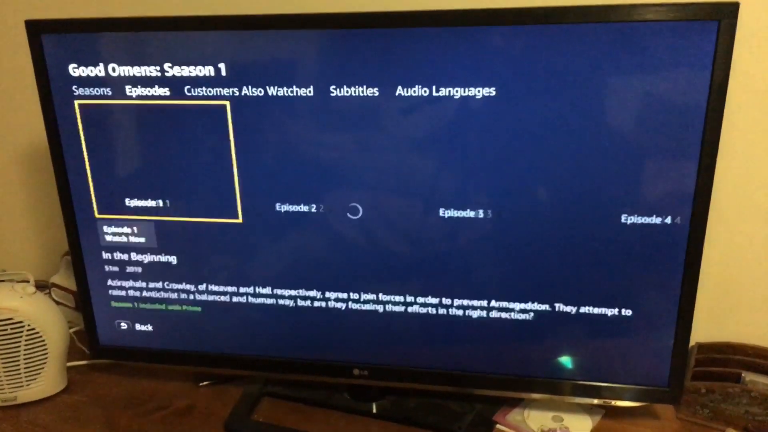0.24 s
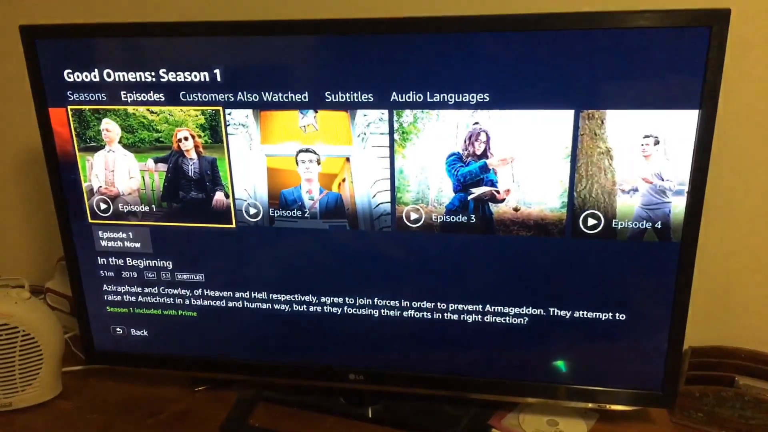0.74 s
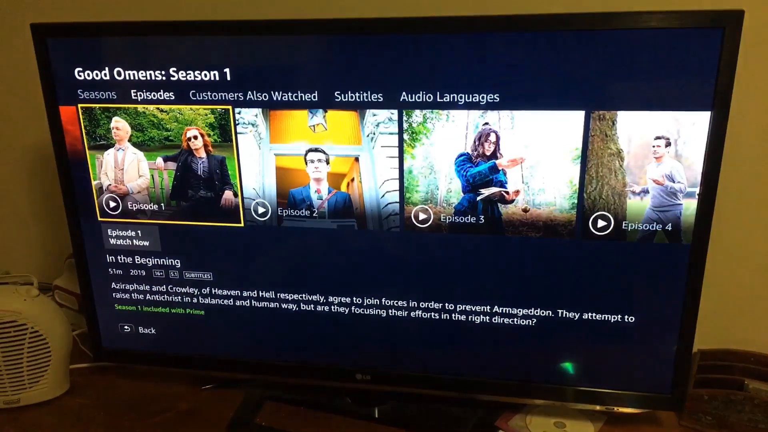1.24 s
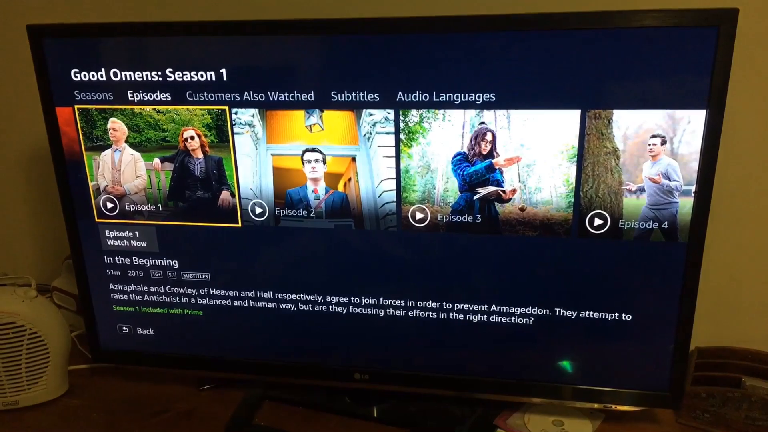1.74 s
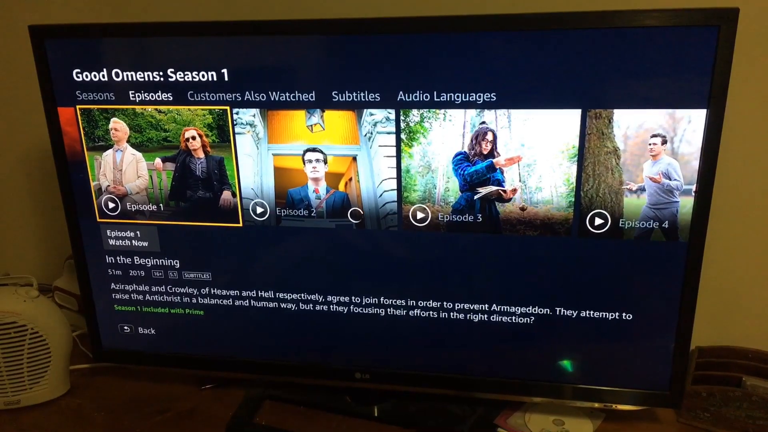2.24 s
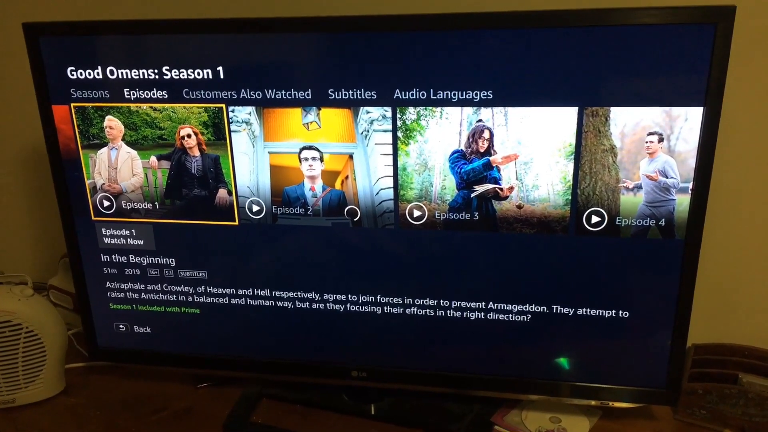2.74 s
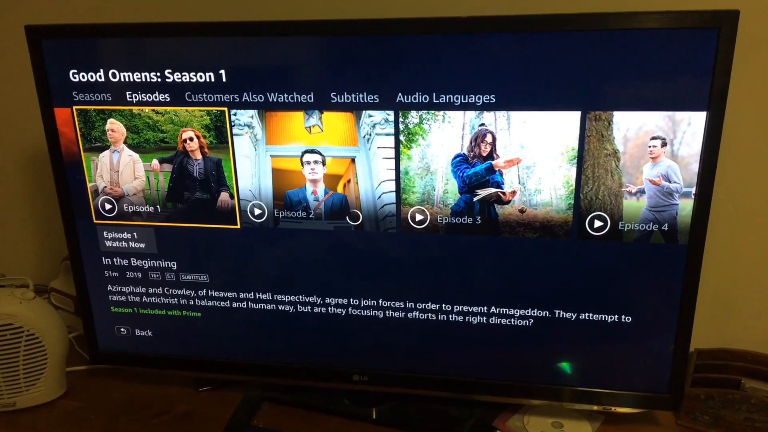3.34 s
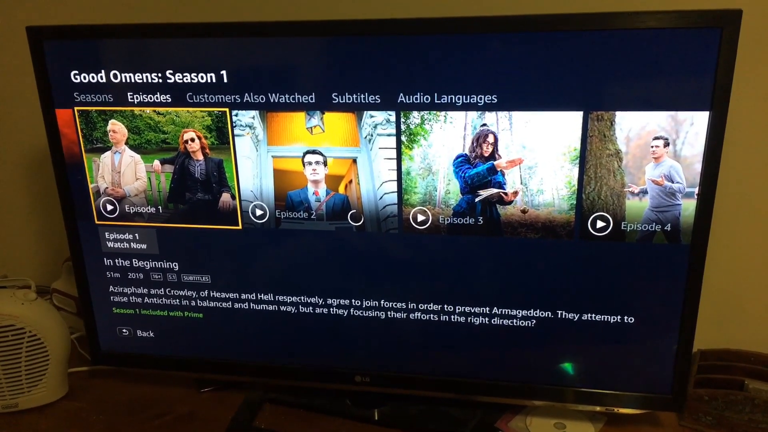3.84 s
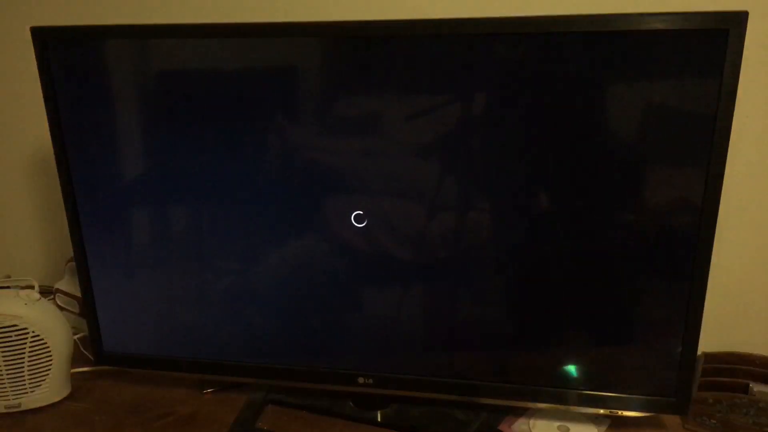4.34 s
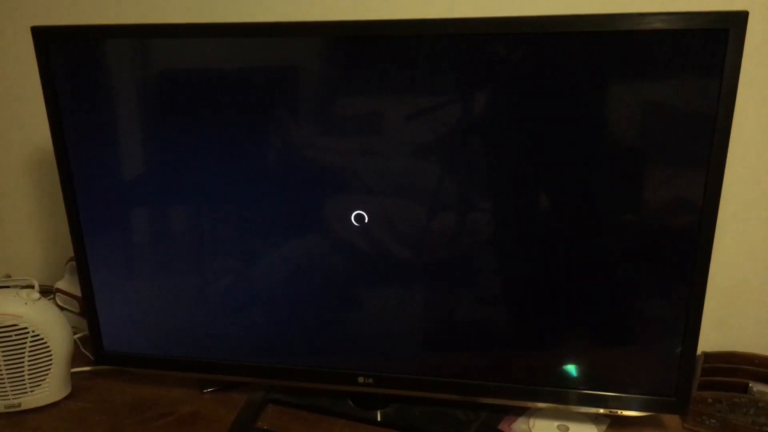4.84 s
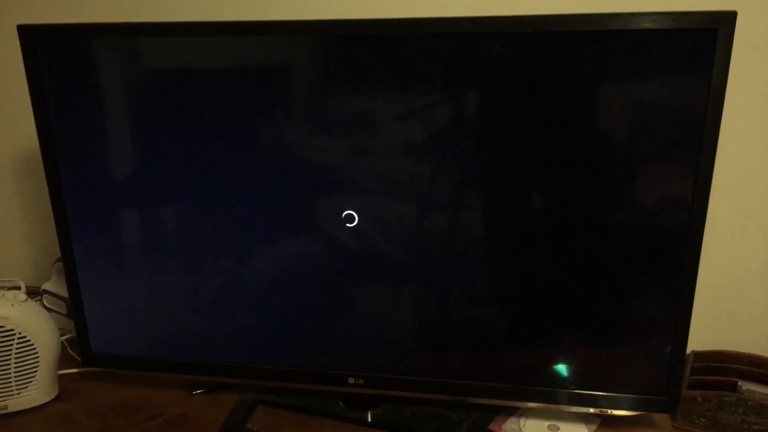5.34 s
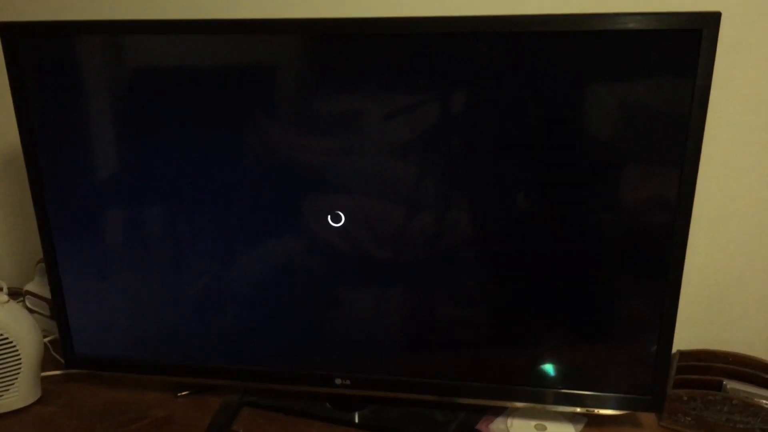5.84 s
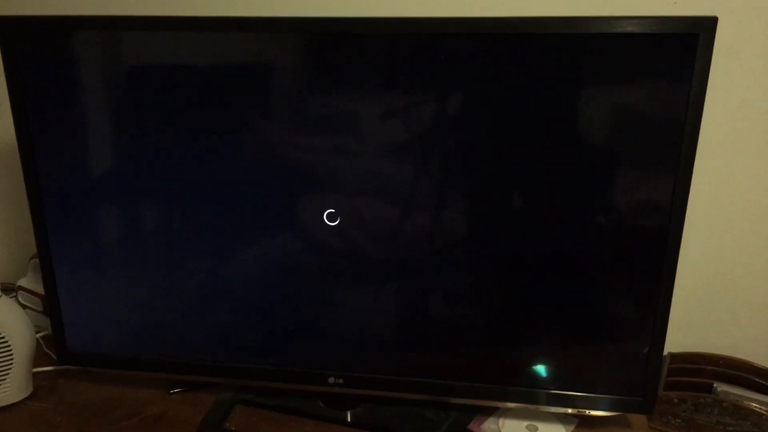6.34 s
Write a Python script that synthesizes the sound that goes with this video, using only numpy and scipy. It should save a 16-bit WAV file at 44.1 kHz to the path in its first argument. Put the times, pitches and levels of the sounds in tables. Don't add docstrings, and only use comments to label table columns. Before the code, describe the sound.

Plastic remote control buttons click in irregular bursts in a small quiet room, with a few dry finger taps, over a low steady fan hum and soft hiss.

```python
import sys
import numpy as np
from scipy import signal
from scipy.fft import rfft, irfft, next_fast_len
from scipy.io import wavfile
from scipy.ndimage import uniform_filter1d

SR = 44100
rng = np.random.default_rng(int(sys.argv[2]) if len(sys.argv) > 2 else 0)


def to_wav(s):
    ch = np.atleast_2d(s).T
    pcm = np.round(np.clip(ch, -1, 1) * 32767)
    wavfile.write(sys.argv[1], SR, pcm.astype(np.int16))


def invert_db(x):
    u = np.asarray(x, float) / 20
    return 10 ** u


N = 291060
STEADY_TOP_HZ = 15780


def unit(x):
    return x / np.sqrt(np.mean(x ** 2) + 1e-20)


def along(points, hz):
    point_hz, value = np.transpose(points)
    return np.interp(np.log(hz + 1), np.log(point_hz + 1), value)


def curves(rows):
    time_s, *columns = np.transpose(rows)
    return [np.interp(np.arange(N) / SR, time_s, column) for column in columns]


def noise(spectrum):
    size = next_fast_len(N)
    hz = np.fft.rfftfreq(size, 1 / SR)
    colour = invert_db(along(spectrum, hz)) * (hz < STEADY_TOP_HZ)
    return unit(irfft(rfft(rng.standard_normal(size)) * colour, size)[:N])


def placed(rows, times, early):
    out = np.zeros(N + SR)
    for row, s in zip(rows, times):
        out[round((s - early) * SR):][:len(row)] += row
    return out[:N]


# (pitch_hz, time_to_fade_60_db_s)
ROOM_RING = [(300, 0.6), (1000, 0.4), (2800, 0.42), (7000, 0.35), (15000, 0.18)]


def tails(count, onset):
    size = SR // 2
    hz, t, z = signal.stft(rng.standard_normal((count, size)), SR, nperseg=256)
    fade_s = along(ROOM_RING, hz)[:, None]
    z = z * (hz < STEADY_TOP_HZ)[:, None] / np.sqrt(fade_s)
    tail = signal.istft(z * invert_db(-60 * t / fade_s), SR, nperseg=256)[1][:, :size]
    tail = tail * (1 - np.exp(-np.arange(size) / SR / onset))
    return tail / np.sqrt(np.mean(np.sum(tail ** 2, axis=1)))


# (pitch_hz, level_db_per_hz)
HISS_COLOUR = [(100, -2), (300, -6.5), (500, -15), (1100, -12), (2100, -11), (3200, -19.5), (7500, -20),
               (15700, -9.5)]
# (pitch_hz, level_db_per_hz)
MURMUR_COLOUR = [(50, -20), (75, -7), (120, -1.5), (300, -8), (420, -11.5), (700, -17)]
# (middle_s, rise_db, half_length_s)
FAR_SWELLS = [
    (.3, 3, 0.44),
    (3.103, 5.5, 0.17),
]


def air():
    t = np.arange(N) / SR
    swell_db = sum(db * np.exp(-((t - s) / half) ** 2) for s, db, half in FAR_SWELLS)
    murmur_db = -67.5 - 0.5 * t + swell_db
    return invert_db(murmur_db) * noise(MURMUR_COLOUR) + invert_db(-68.5) * noise(HISS_COLOUR)


# (pitch_hz, level_db_rms)
HUM_TONES = [
    (48.79, -42),
    (97.58, -72.5),
    (90, -76),
    (105.48, -75.7),
    (200, -78.5),
    (312, -82),
]
# (pitch_hz, level_db_per_hz)
RUMBLE = [(12, -25), (25, 0), (36, 0), (45, -2), (58, -9), (70, -12), (110, -40)]
# (pitch_hz, level_db_per_hz)
TREMOR = [(.3, -30), (1, -6), (4, -8), (7, 0), (11, -8), (16, -40)]
# (time_s, unsteadiness_0_to_1)
HAND_UNSTEADINESS = [
    (0, 0),
    (4.2, 0),
    (4.5, .6),
    (5.4, .5),
    (6.2, .5),
    (6.6, 1),
]


def fan():
    t = np.arange(N) / SR
    (hand,) = curves(HAND_UNSTEADINESS)
    hum = sum(-np.sqrt(2) * invert_db(db) * np.sin(2 * np.pi * hz * t) for hz, db in HUM_TONES)
    waver_db = (0.25 + 1.15 * hand) * noise(TREMOR)
    rumble_db = -66 + 5 * hand
    return hum * invert_db(waver_db) + invert_db(rumble_db) * noise(RUMBLE)


# (start_s, level_db, pitch_hz)
TABLE_KNOCKS = [(0.665, -37, 1580), (.672, -48, 740), (3.0067, -42, 1840), (3.005, -41.5, 1070),
                (3.214, -41, 780), (3.241, -38.5, 850), (3.347, -40, 307), (4.575, -48, 820),
                (5.094, -57, 241), (5.593, -35, 1940), (5.658, -56, 150), (5.797, -52, 507),
                (5.999, -45, 960), (6.323, -29.5, 2160), (6.408, -43.5, 1200), (6.437, -43, 1200),
                (6.461, -56, 164), (6.518, -36, 2050)]


def thumps():
    rows, t = np.array(TABLE_KNOCKS), np.arange(2600) / SR
    level_db, hz = rows[:, 1:2], rows[:, 2:]
    fade = invert_db(level_db - 60 * t * hz / 12)
    rise = 1 - np.exp(-t * hz / 0.5)
    knock = fade * np.sin(2 * np.pi * hz * t) * rise
    path = invert_db(-12) * tails(len(rows), onset=.003)
    path[:, 0] = 1
    return placed(signal.fftconvolve(knock, path, axes=1), rows[:, 0], 0)


# (start_s, peak_db, dull_db, bright_db)
FINGER_TAPS = [
    (1.4027, -25, -10.5, -12.5),
    (1.5699, -26, -9, -15.5),
    (5.796, -38.5, -9, -30),
    (5.902, -39, -13, -5.5),
    (5.986, -50, -6, -10),
    (6.312, -38.5, -18, -1),
    (6.323, -37, -8, -27),
]
# (pitch_hz, level_db, time_to_fade_60_db_s)
SHELL_NOTES = [(375, -10.5, .012), (550, -19, 0.02), (844, -6.5, 0.012), (1347, -5.5, 0.0058),
               (1910, -11.5, 0.014), (2940, -0.5, 0.0068), (3960, -19, 0.011), (4600, -21.5, 0.0093),
               (7300, 0, 0.0011), (11300, 0.5, 0.00076)]


def taps():
    rows, t = np.array(FINGER_TAPS), np.arange(900) / SR
    level, dull, bright = rows.T[1:, :, None]
    knock = 0
    for k, (hz, db, t60) in enumerate(SHELL_NOTES):
        late_s = .0016 * min(1, 800 / hz) ** 1.5
        age = np.clip(t - late_s, 0, None)
        share = np.where(hz < 2400, dull + 10, np.where(hz > 5500, bright + 15, 0))
        fade = invert_db(level + share + db - 60 * age / t60)
        rise = 1 - np.exp(-age * hz)
        knock = knock + (-1) ** k * fade * np.sin(2 * np.pi * hz * age) * rise
    path = invert_db(-14) * tails(len(rows), onset=.006)
    path[:, 0] = 1
    return placed(signal.fftconvolve(knock, path, axes=1), rows[:, 0], .0002)


# (start_s, peak_db, low_ring_db, top_ring_db)
BIG_KEY_CLICKS = [(.1375, -62, 7, -20), (0.1697, -45, -11, -31), (0.5682, -43.5, -10, -12),
                  (.603, -22.5, -16, -17), (1.4569, -36, -10, -7), (1.5943, -31, -12.5, -7),
                  (.19, -50.5, -3, -30), (1.759, -42, -8.5, -27), (2.4713, -32, -10.5, -38),
                  (2.7212, -24, -7.5, -7), (3.3198, -39.5, 0.5, -8), (3.3503, -5, -13.5, -6.5),
                  (4.0126, -41, -10, -6), (4.1015, -42, -9.5, -20), (4.148, -26.5, -10, -23),
                  (4.4765, -40, -11, -30), (4.4929, -22, -7, -9.5), (4.5734, -20.5, -5.5, -16.5),
                  (4.712, -34.5, -14, -13.5), (5.3008, -24.5, -21.5, -10.5), (5.3902, -18, -22.5, -25),
                  (5.434, -32, -4.5, -4.5), (5.4947, -22.5, -24, -6), (5.593, -51, -3, -33),
                  (6.021, -35.5, -11, -14.5), (6.4042, -34, -9, -10.5), (6.455, -28, -13, -2)]
# (start_s, peak_db, low_ring_db, top_ring_db)
SMALL_KEY_CLICKS = [(0.669, -25, -10, -16), (3.184, -31, -13.5, -7), (3.5662, -41.5, -5.5, 5),
                    (3.627, -24, -10, -13.5), (4.944, -27, -39, -40), (5.028, -37.5, -12, -6),
                    (5.3337, -22, -20, -6.5), (5.3622, -19, -18, -27), (5.671, -18, -16, -6.5),
                    (5.7987, -26.5, -14.5, -20)]
# (start_s, peak_db, low_ring_db, top_ring_db)
LOOSE_GRIP_CLICKS = [(0.6753, -19.5, -11.5, -20), (1.038, -47.5, -4.5, -15), (1.9967, -43, 1.5, -37),
                     (3.157, -31, -19.5, -12), (3.2133, -20.5, -15, -11.5), (5.4419, -38.5, 1.5, -7),
                     (6.185, -10, -16, -8)]
# (start_s, peak_db, low_ring_db, top_ring_db)
TIGHT_GRIP_CLICKS = [(0.2628, -37, -18, -34), (.3528, -18, -22.5, -22), (1.332, -45, -7, -24),
                     (2.693, -23, -18.5, -15.5), (4.391, -47.5, -1, -34), (4.5373, -16, -20, -13)]
# (start_s, peak_db, low_ring_db, top_ring_db)
SEAM_CREAKS = [
    (1.1792, -42, -12, -28),
    (1.2477, -48.5, -5.5, -16),
    (2.321, -46, -7, -16),
    (5.2505, -49, -8, -19),
]
# (low_ring_hz, middle_ring_hz)
CASE_RINGS = [
    (2136, 4440),
    (1995, 5660),
    (1780, 4630),
    (2600, 4700),
    (1440, 4300),
]


def clicks():
    kinds = [BIG_KEY_CLICKS, SMALL_KEY_CLICKS, LOOSE_GRIP_CLICKS, TIGHT_GRIP_CLICKS, SEAM_CREAKS]
    rows = []
    for kind, (low_hz, middle_hz) in zip(kinds, CASE_RINGS):
        for s, peak_db, low_db, top_db in kind:
            rows.append((s, peak_db, low_hz, low_db, middle_hz, top_db))
    return np.array(sorted(rows))


RING_SHARPNESS = (1.8, 1.2, 1.5)


def case_colour(rows):
    f = np.fft.rfftfreq(1024, 1 / SR) + 1
    level, low_hz, low_db, middle_hz, top_db = rows.T[1:, :, None]
    rings = [(low_hz, low_db + 9.0), (middle_hz, -4), (11500, top_db + 6.0)]
    rings.append((1200, low_db - 0.5))
    power = 0
    for (hz, db), sharpness in zip(rings, [*RING_SHARPNESS, 1.08]):
        power = power + invert_db(2 * db) / (1 + (sharpness * (hz / f - f / hz)) ** 2) ** 2
    ripple = unit(uniform_filter1d(rng.standard_normal(power.shape), size=9, axis=1))
    power = power * invert_db(2.5 * ripple)
    cepstrum = irfft(np.log(power + 1e-20) / 2)
    cepstrum[:, 1:512] *= 2
    cepstrum[:, 513:] = 0
    return invert_db(level + 15) * irfft(np.exp(rfft(cepstrum)))


# (delay_s, level_db)
WALL_ECHOES = [
    (0, 1),
    (.0062, -8),
    (.0085, -7),
    (.0108, -8),
    (.0195, -6),
    (.0265, -14),
]


def buttons():
    rows = clicks()
    ahead = 200
    path = invert_db(2.5) * np.roll(tails(len(rows), onset=.006), ahead, axis=1)

    t = np.arange(441) / SR
    face = invert_db(-22.5 - 60 * t / 0.01) * np.sin(2 * np.pi * rows[:, 2:3] * t)
    path[:, ahead:][:, :len(t)] += face

    for delay, db in WALL_ECHOES:
        snap = rng.standard_normal((len(rows), 128)) * np.exp(-np.arange(128) / 75)
        spectrum = rfft(snap)
        snap = irfft(spectrum / np.abs(spectrum) ** .8)
        snap = snap / np.linalg.norm(snap, axis=1, keepdims=True)
        path[:, ahead + round(delay * SR):][:, :128] += invert_db(db) * snap

    through_table = uniform_filter1d(rng.standard_normal((len(rows), ahead)), size=4, axis=1)
    path[:, :ahead] = through_table * (invert_db(-27) * np.exp(-np.arange(ahead) / 30) + invert_db(-35))
    sound = signal.fftconvolve(case_colour(rows), path, axes=1)
    return placed(sound, rows[:, 0] + .0006, ahead / SR)


def scene():
    return (buttons() + thumps() + taps() + fan() + air())[None]


def top_cut(x):
    return signal.sosfilt(signal.butter(12, 16810, fs=SR, output="sos"), x)


# (pitch_hz, level_db)
MIC_COLOUR = [(100, 0), (1500, 4), (2100, 1.5), (3100, 1.5), (4200, 0.5), (5100, -4), (6000, 0),
              (8000, -2.5), (9400, -1.5), (10450, -7), (11600, -4), (15700, -6)]


def record(dry):
    top_hz, edge = 16750, 512
    wide = np.pad(dry, ((0, 0), (edge, edge)), "reflect", reflect_type="odd")
    f = np.fft.rfftfreq(wide.shape[1], 1 / SR)
    colour_db = along(MIC_COLOUR, f) - 21 * (f > STEADY_TOP_HZ)
    heard = irfft(rfft(wide) * invert_db(colour_db) * (f < top_hz), wide.shape[1])
    return top_cut(heard[:, edge:-edge])


dry = scene()
out = record(dry)
to_wav(out)
```